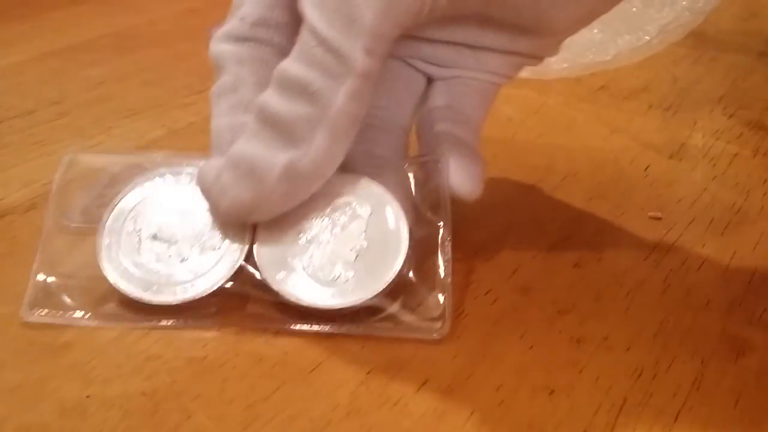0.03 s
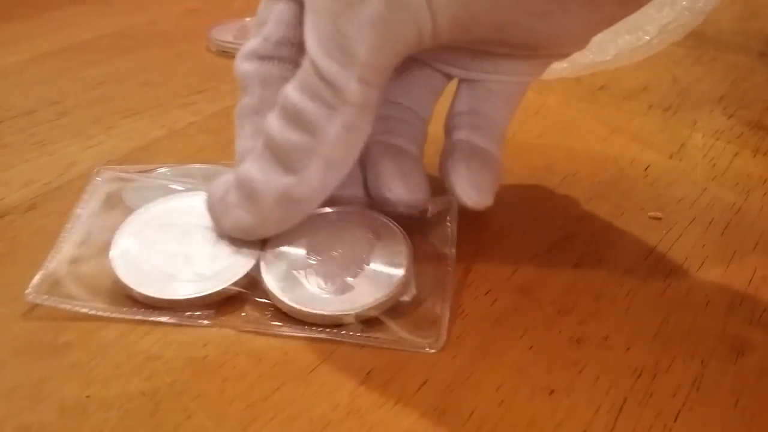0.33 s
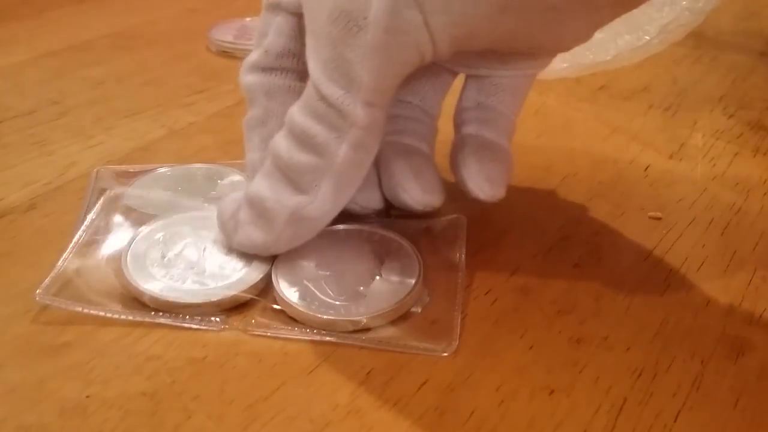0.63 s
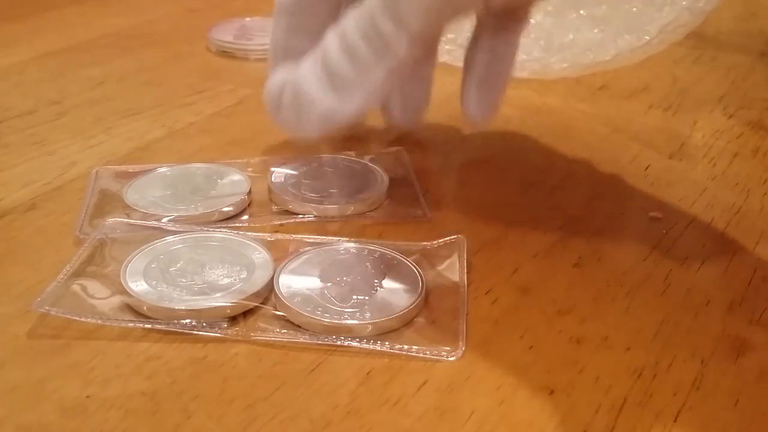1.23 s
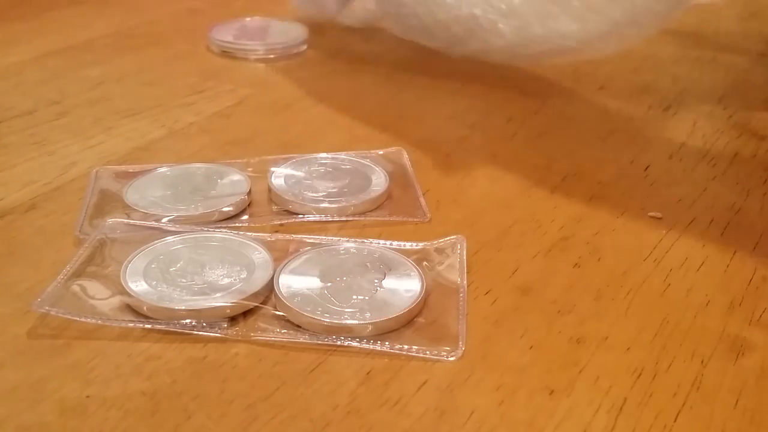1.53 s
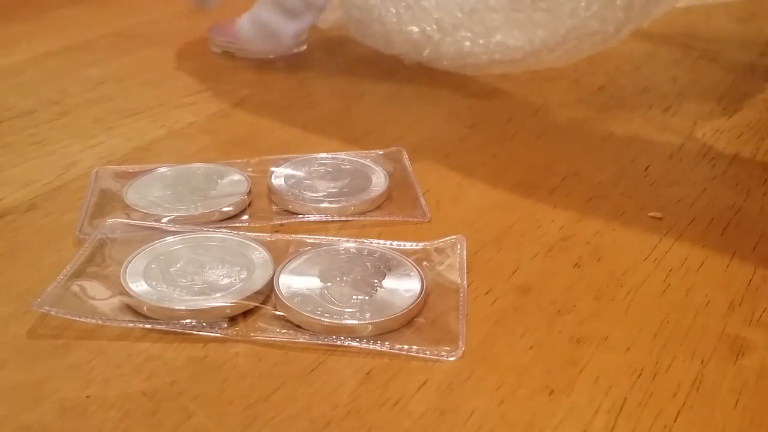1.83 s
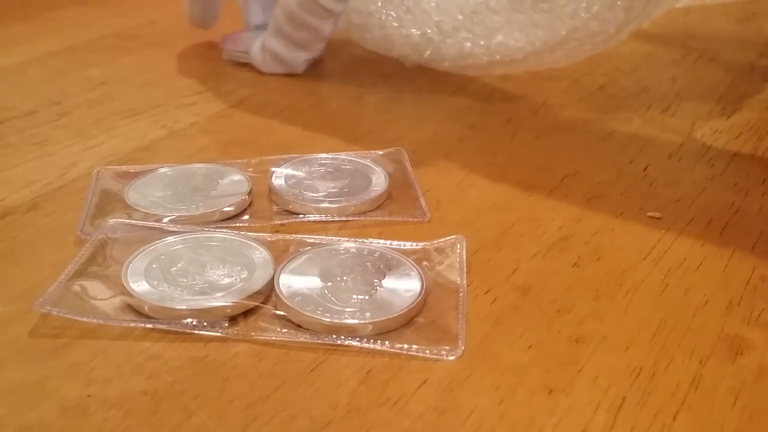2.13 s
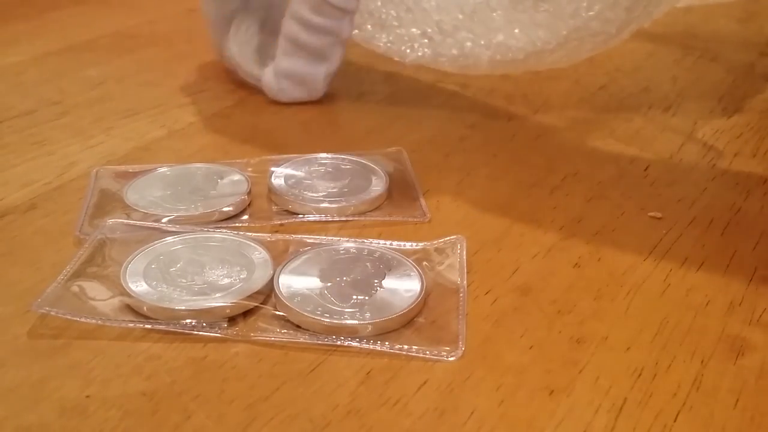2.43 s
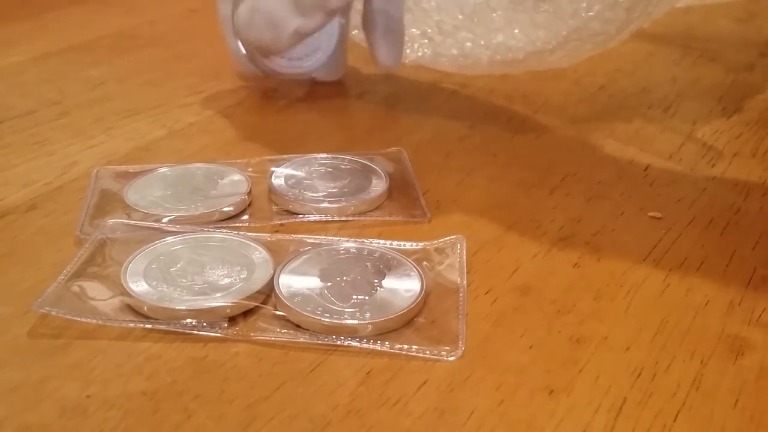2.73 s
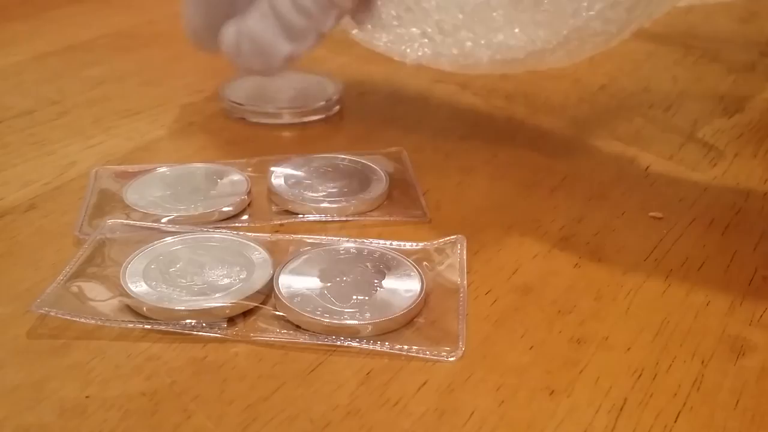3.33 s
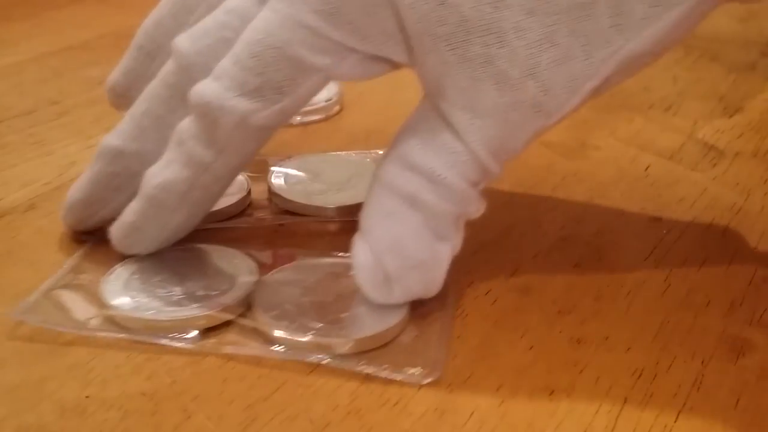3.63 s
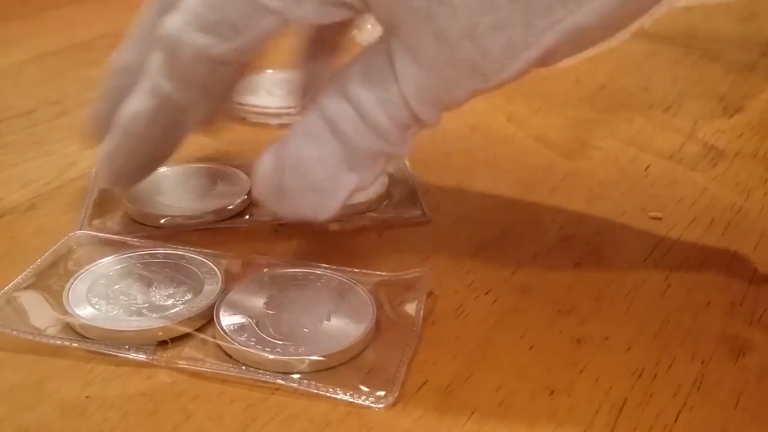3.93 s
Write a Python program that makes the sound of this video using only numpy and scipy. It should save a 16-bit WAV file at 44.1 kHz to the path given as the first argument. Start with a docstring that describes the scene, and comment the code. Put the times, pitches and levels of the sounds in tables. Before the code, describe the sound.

Plastic-covered coins are set down on wood with light knocks, then a sharp clack.

```python
"""Coins meet a wooden table: a gloved hand lays some down in soft plastic sleeves, then slides, tips and
sets down one in a hard capsule. Each contact thuds and knocks in the table top and clacks and clicks in
coin and plastic. In between, wrapping rustles and snaps, and the dragged rim scrapes and faintly sings.
A small room answers, with an appliance humming over its low drone and hiss."""
import sys
import numpy as np
from scipy import signal
from scipy.fft import rfft, irfft, next_fast_len
from scipy.io import wavfile
from scipy.ndimage import map_coordinates

SR = 44100
rng = np.random.default_rng(int(sys.argv[2]) if len(sys.argv) > 2 else 0)


def transcribe(u):
    """Save the signal u as a 16-bit wav file named by the first command-line argument.

    u: samples, shape (n,) or (channels, n), limited to [-1, 1]; the rate is SR.
    q: integer samples, one column per channel.
    """
    v = np.clip(np.atleast_2d(u).T, -1, 1)
    q = np.round(v * 32767).astype(np.int16)
    wavfile.write(sys.argv[1], SR, q)


N = 176400

# Room tone, the hiss and the low drone. Each row: frequency in Hz, EQ gain in dB.
AIR_EQ = [(410, -28), (700, -4.5), (1170, -0.5), (1590, -2), (1810, -8.5), (2490, -18), (3660, -16),
          (6040, -20.5), (13900, -19), (15000, -48)]
DRONE_EQ = [(20, -33), (40, -29), (60, -7), (85, -14.5), (115, -2), (160, 0.5), (195, 0), (240, 0),
            (300, -6.5), (420, -7), (530, -7.5), (650, -9), (800, -20.5), (1500, -51)]
# Appliance hum. Each row: pitch in Hz, level in dB, waver in Hz, flutter in dB, pan to the left in dB.
HUM_PARTIALS = [(120, -47, 0.85, 0.96, 2.5), (235.5, -57, 6.155, -4.5, 2.5), (581, -57.5, 2.68, 1, 7)]
# Swells of the hum, used around their means. Each row: time in seconds, lowest and highest partial in dB.
HUM_SWELLS = [(0, -44.5, -56.5), (.25, -51, -63), (.55, -49, -58), (1.02, -46.5, -55), (1.16, -51.5, -59),
              (1.27, -43.5, -57.5), (1.5, -52.5, -55.5), (1.8, -49, -53), (2.25, -45, -58),
              (2.9, -48, -55.5), (4, -45, -56)]
# Stereo image of diffuse sound. Each row: frequency in Hz, left-right correlation (1 is mono).
CORRELATION = [(30, 0.66), (100, 1), (250, 0.9), (600, 0.62), (1500, 0.034), (5000, 0.033), (14000, 0.3)]
# The room's tail. Each row: frequency in Hz, seconds to fall 60 dB.
ROOM_DECAY = [(100, 0.22), (260, 0.62), (700, 0.38), (1840, 0.42), (4850, 0.31), (12800, 0.26)]
# Placement of the direct sound and of the reverb. Each row: frequency in Hz, pan to the left in dB.
DIRECT_PAN = [(500, 2.5), (1000, 0.2), (2000, 2.9), (3300, -1.5), (4600, 1.8), (6500, -3.5), (9000, 4.5),
              (12000, 2)]
REVERB_PAN = [(4500, 4), (6500, -2.8), (9000, 4.5)]
# The hand brushing the wrapping. Each row: time in seconds, level in dB.
RUSTLE_FADER = [(0, -56.5), (.035, -47), (.06, -66.5), (.4, -69), (.84, -74), (.858, -44), (.88, -68),
                (1.15, -75), (1.42, -68), (1.47, -57), (1.58, -52.5), (1.69, -58), (1.75, -59), (1.82, -74),
                (1.88, -53), (1.97, -56), (2.05, -63.5), (2.32, -61), (2.4, -69), (3.47, -65.5),
                (3.52, -51.5), (3.6, -70), (3.71, -57), (3.78, -71.5)]
# The capsule sliding over the grain. Each row: time in seconds, table rumble in dB, rim scrape in dB.
SLIDE_FADERS = [(.4, -74, -70), (.7, -71, -62.5), (.85, -64, -63), (1.1, -71, -66), (1.9, -66, -64.5),
                (2.03, -63.5, -60), (2.22, -59, -68), (2.31, -53.5, -55), (2.39, -65, -64),
                (2.47, -48, -58.5), (2.51, -50, -56.5), (2.56, -38, -62), (2.62, -67, -77),
                (2.75, -66, -64)]
# Tone of the wrapping, the rubbed table and the rim. Each row: frequency in Hz, EQ gain in dB.
RUSTLE_EQ = [(500, -2), (1500, -5), (4500, -3), (7000, -2), (10000, -4.5), (12500, -10), (15000, -27)]
RUMBLE_EQ = [(150, -24), (330, 1.5), (480, -2.5), (650, 3.5), (900, -2.5), (1150, -8), (3000, -65)]
SCRAPE_EQ = [(700, -28), (1600, 0), (1850, -12), (2030, -3.5), (2250, -4), (2550, -6.5), (3200, -12),
             (6000, -15)]
# Ticks of buckling plastic. Each row: start in seconds, level in dB, pitch in Hz.
PLASTIC_SNAPS = [(.0087, -43, 1610), (.164, -56, 4400), (1.56, -54.5, 5500), (1.958, -53, 10500),
                 (1.9953, -38.5, 5300), (2.325, -49.5, 2100), (2.441, -47.5, 1840), (2.5665, -35.5, 4900),
                 (2.9003, -37.5, 3030), (3.508, -49.5, 6140), (3.522, -58, 5900), (3.701, -51.5, 4580),
                 (3.902, -52.5, 1420)]
# Ring of the table top and of the coin in its capsule.
# Each row: pitch in Hz, relative level in dB, seconds to fall 60 dB.
WOOD_MODES = [(268, -1, 0.21), (345.7, 8.5, 0.48), (652, 4, 0.18), (772, 4.5, 0.085), (886, -1.5, 0.15),
              (952, 2.5, 0.12), (1018, 2, 0.14), (1314, -4, 0.13), (1755, 4, 0.19), (2200, 10, 0.2)]
COIN_MODES = [(5400, 2.5, 0.048), (8310, 1, 0.022), (9350, 5, 0.026), (10630, 0, 0.023)]
# Tone of a contact's low, middle and top layers. Each row: frequency in Hz, EQ gain in dB.
THUD_EQ = [(30, -97), (70, -17), (150, -4.5), (250, -0.5), (380, -9), (520, -14), (900, -25), (3000, -60)]
CLACK_EQ = [(300, -15), (1000, 2), (1700, 6), (2300, 6), (3000, 3.5), (4000, -0.5), (5300, 5.5), (6500, -1),
            (14000, -58)]
CLICK_EQ = [(800, -31), (3500, -2), (5200, 0), (6100, -9.5), (7300, 7), (8600, -2), (9400, 0), (10200, 5.5),
            (11000, -2.5), (12600, 0.5), (15000, -22)]
# Coins meeting the table. Each row: start in seconds, levels of thud, knock, clack and click in dB,
# knock pitch in Hz, high cut of the clack in Hz.
COIN_HITS = [(0.8659, -45, -33.5, -35, -47, 910, 3900), (0.8690, -40.5, -31, -42, -63, 1050, 3220),
             (0.904, -45, -37, -37, -51, 920, 4500), (0.9070, -40, -32, -37, -60, 1030, 3200),
             (1.974, -46, -38, -43.5, -52, 870, 2470), (1.9953, -42, -40.5, -31.5, -47, 780, 3800),
             (2.5329, -39.5, -47, -40, -42.5, 790, 6070), (2.548, -41, -40, -39, -48.5, 810, 7000),
             (2.5665, -40, -42, -37, -34, 795, 8000), (2.9006, -32.5, -28.5, -41.5, -37.5, 700, 4330),
             (2.921, -44, -35.5, -48.5, -62, 696, 3500), (3.148, -44.5, -31.5, -62, -56, 910, 2500),
             (3.156, -40.5, -36, -43, -45, 940, 5930), (3.1595, -33.5, -46, -38, -36, 865, 7000),
             (3.1725, -47, -32.5, -36.5, -38, 895, 6960), (3.288, -26.5, -20.5, -23.5, -17, 926, 6900),
             (3.303, -43, -39, -26.5, -49, 1090, 3020), (3.3069, -31.5, -28, -32, -28.5, 1030, 5870),
             (3.315, -34.5, -30.5, -34, -41, 850, 6040)]

FLAT_EQ = [(20, 0), (20000, 0)]
SIDES = np.array([[1], [-1]])  # left, right
SHOT = 16384  # samples in a one-shot
T, HZ = np.arange(SHOT) / SR, np.fft.rfftfreq(SHOT, 1 / SR)


def amp(db):
    """Decibels to gain."""
    return 10 ** (np.asarray(db) / 20)


def unit(x):
    """Scale to rms 1."""
    return x / np.sqrt(np.mean(x ** 2) + 1e-20)


def unit_hit(x):
    """Give a one-shot the energy of 6 ms at rms 1."""
    return unit(x) * np.sqrt(.006 / T[-1])


def along(points, hz):
    """Read (Hz, value) points on a log frequency axis."""
    f, v = np.transpose(points)
    return np.interp(np.log(hz + 1), np.log(f + 1), v)


def band_db(hz, centre_hz, octaves):
    """A flat-topped band, 3 dB down at this many octaves either side."""
    return -10 * np.log10(1 + (np.log2((hz + 1) / centre_hz) / octaves) ** 4)


def high_cut_db(hz, corner_hz, order):
    """A treble roll-off of 6 dB an octave for each order."""
    return -10 * np.log10(1 + (hz / corner_hz) ** (2 * order))


def faders(rows):
    """One curve over the scene for each column after the time."""
    times, *columns = np.transpose(rows)
    return [np.interp(np.arange(N) / SR, times, column) for column in columns]


def wobble(rate):
    """A smooth random curve, rate knots a second."""
    return map_coordinates(rng.standard_normal(int(N * rate / SR) + 4), [np.arange(N) * rate / SR])


def filtered(x, response):
    """Filter x with a gain given as a function of frequency."""
    n = x.shape[-1]
    padded = next_fast_len(n + SR // 5)
    return irfft(rfft(x, padded) * response(np.fft.rfftfreq(padded, 1 / SR)), padded)[..., :n]


def add(track, start_s, x):
    """Mix x into the track."""
    part = track[:, max(round(start_s * SR), 0):][:, :x.shape[1]]
    part += x[:, :part.shape[1]]


def band_pan(x, pan):
    """Lean a stereo sound left or right, band by band."""
    return filtered(x, lambda hz: amp(SIDES * along(pan, hz)))


def width(hz, corner_hz=1470):
    """Stereo width of the direct sound: mono in the bass, wide above the corner."""
    return hz / np.hypot(hz, corner_hz)


def narrow_noise(shape, centre_hz, octaves):
    """A whistling band of noise at rms 1."""
    return unit(filtered(rng.standard_normal(shape), lambda hz: amp(band_db(hz, centre_hz, octaves))))


def diffuse(eq, size):
    """Coloured stereo noise at rms 1, narrow in the bass and wide in the treble."""
    def mid_side_gains(hz):
        angle = np.arccos(np.clip(along(CORRELATION, hz), -1, 1)) / 2
        return amp(along(eq, hz)) * [np.cos(angle), np.sin(angle)]
    mid, side = filtered(rng.standard_normal((2, size)), mid_side_gains)
    return unit(mid + SIDES * side)


def room_tone():
    """Steady air: a soft hiss, a low drone leaning left and a thin high whistle."""
    hiss = amp(-64) * diffuse(AIR_EQ, N)
    drone = amp(-55 + 3 * SIDES) * diffuse(DRONE_EQ, N)
    whistle = amp(-76) * narrow_noise((2, N), centre_hz=7200, octaves=.024)
    return hiss + drone + whistle


def appliance_hum():
    """Three partials waver in pitch and flutter in level; the outer two also swell slowly."""
    out = np.zeros((2, N))
    low_db, high_db = faders(HUM_SWELLS)
    swells = (low_db - low_db.mean(), 0, high_db - high_db.mean())
    for (hz, db, waver_hz, flutter_db, left_db), swell_db in zip(HUM_PARTIALS, swells):
        phase = 2 * np.pi * np.cumsum(hz + waver_hz * wobble(9)) / SR
        out += amp(db + swell_db + flutter_db * wobble(7.91) + SIDES * left_db) * np.sin(phase)
    return out


def in_room(x, tail_db=-9, early_db=-9, early_t60=.11, attack_s=.0033):
    """The direct sound, plus early scatter off nearby things and the small room's tail."""
    hz, t, bands = signal.stft(diffuse(FLAT_EQ, SHOT), SR, nperseg=256)
    decay = amp(-60 * t / along(ROOM_DECAY, hz)[:, None])
    tail = signal.istft(bands * decay, SR, nperseg=256)[1][:, :SHOT]
    early = diffuse(FLAT_EQ, SHOT) * amp(-60 * T / early_t60)
    attack = 1 - np.exp(-T / attack_s)
    impulse = (amp(tail_db) * unit(tail * attack) + amp(early_db) * unit(early * attack)) / np.sqrt(SHOT)
    direct = band_pan(np.pad(x, ((0, 0), (0, SHOT - 1))), DIRECT_PAN)
    return direct + signal.fftconvolve(x, band_pan(impulse, REVERB_PAN), axes=1)


def friction(level_db, eq, grain_db, grains_per_s):
    """Rubbing: a hiss broken into tiny slips, heard in the room."""
    slips = unit(amp(grain_db * wobble(grains_per_s)) * diffuse(FLAT_EQ, N))
    rubbing = unit(filtered(slips, lambda hz: amp(along(eq, hz))))
    return in_room(amp(level_db) * rubbing)[:, :N]


def wrapping_rustle():
    """The glove brushes the wrapping into a bright, fine-grained crinkle."""
    level_db, = faders(RUSTLE_FADER)
    return friction(level_db, RUSTLE_EQ, grain_db=3.5, grains_per_s=880)


def capsule_slide():
    """The table rumbles under the sliding capsule while its rim scrapes over the grain."""
    rumble_db, scrape_db = faders(SLIDE_FADERS)
    rumble = friction(rumble_db, RUMBLE_EQ, grain_db=2.5, grains_per_s=400)
    scrape = friction(scrape_db, SCRAPE_EQ, grain_db=3, grains_per_s=150)
    return rumble + scrape


def rim_squeak(start_s=2.06, end_s=2.33, level_db=-66, flutter_db=3.5):
    """The dragged rim sings faintly in one narrow resonance, in fits."""
    gate, = faders([(start_s - .03, 0), (start_s, 1), (end_s, 1), (end_s + .02, 0)])
    tone = narrow_noise(N, centre_hz=1990, octaves=.07)
    squeak = amp(level_db + flutter_db * wobble(40)) * gate * tone
    return in_room(np.tile(squeak, (2, 1)))[:, :N]


def burst(eq_db, t60, strike_db=19, hold_s=.0023):
    """A sharp first touch, then chatter that holds for a moment and dies fast."""
    # Folding the cepstrum makes the EQ minimum phase, so nothing rings ahead of the attack.
    cepstrum = irfft(np.log(amp(eq_db) + 1e-6))
    cepstrum[1:SHOT // 2] *= 2
    cepstrum[SHOT // 2 + 1:] = 0
    chatter = rng.standard_normal((2, SHOT)) * amp(-60 * np.maximum(T - hold_s, 0) / t60)
    chatter[0, 0] += amp(strike_db)
    mid, side = rfft(chatter) * np.exp(rfft(cepstrum))
    return unit_hit(irfft(mid + SIDES * width(HZ) * side))


def ring(modes, drive_db=0, detune=0, scatter_db=2):
    """Damped modes, balanced differently by each strike; detune lets the grip shift their pitch."""
    hz, db, t60 = np.transpose(modes)[:, :, None]
    hz = hz * (1 + detune * rng.standard_normal(hz.shape))
    db = db + np.reshape(drive_db, (-1, 1)) + scatter_db * rng.standard_normal(hz.shape)
    phase = rng.uniform(0, 2 * np.pi, hz.shape) + width(hz) * rng.standard_normal((2, *hz.shape))
    partials = amp(db - 60 * T / t60) * np.sin(2 * np.pi * hz * T + phase)
    attack = 1 - np.exp(-T * hz)
    return unit_hit(np.sum(partials * attack, axis=1))


def plastic_snaps():
    """The plastic buckles with small ticks, each around its own pitch."""
    out = np.zeros((2, N))
    for start_s, db, hz in PLASTIC_SNAPS:
        add(out, start_s, amp(db) * in_room(burst(band_db(HZ, hz, octaves=.3), t60=.014)))
    return out


def hand_bump(start_s=3.149, hz=86.5, level_db=-37, t60=.15):
    """A soft, dry bass bump as the hand's weight comes down with the capsule."""
    out = np.zeros((2, N))
    envelope = amp(level_db - 60 * T / t60) * (1 - np.exp(-T * hz))
    add(out, start_s, envelope[None] * np.sin(2 * np.pi * hz * T))
    return out


def struck_wood(drive_db, t60, ring_db=-1):
    """A burst and the table top's ring, both coloured by drive_db, a function of frequency."""
    mode_hz = np.array(WOOD_MODES)[:, 0]
    return burst(drive_db(HZ), t60) + amp(ring_db) * ring(WOOD_MODES, drive_db(mode_hz))


def coin_hits(wood_cut_hz=2840):
    """Each contact thuds and knocks in the wood, and clacks and clicks in the coin and its plastic."""
    out = np.zeros((2, N))
    for start_s, *levels_db, knock_hz, clack_cut_hz in COIN_HITS:
        knock_eq = lambda hz: band_db(hz, knock_hz, octaves=.4) + high_cut_db(hz, wood_cut_hz, order=2)
        thud = struck_wood(lambda hz: along(THUD_EQ, hz), t60=.04)
        knock = struck_wood(knock_eq, t60=.06)
        clack = burst(along(CLACK_EQ, HZ) + high_cut_db(HZ, clack_cut_hz, order=5), t60=.02)
        click = burst(along(CLICK_EQ, HZ), t60=.009) + amp(-7) * ring(COIN_MODES, detune=.008)
        hit = sum(amp(db) * unit_hit(layer) for db, layer in zip(levels_db, (thud, knock, clack, click)))
        add(out, start_s, in_room(hit))
    return out


def scene(right_lead_s=.00004):
    """The action on the table, reaching the right just before the left, over room tone and hum."""
    table = coin_hits() + hand_bump() + plastic_snaps()
    table += wrapping_rustle() + capsule_slide() + rim_squeak()
    placed = filtered(table, lambda hz: np.exp(-1j * SIDES * np.pi * hz * right_lead_s))
    return placed + room_tone() + appliance_hum()


def record(dry, ceiling=.52, top_hz=14900):
    """A soft clip rounds off the highest peaks, then a steep high cut trims the very top."""
    rounded = dry / (1 + (dry / ceiling) ** 4) ** .25
    return filtered(rounded, lambda hz: amp(high_cut_db(hz, top_hz, order=60)))


dry = scene()
out = record(dry)
transcribe(out)
```